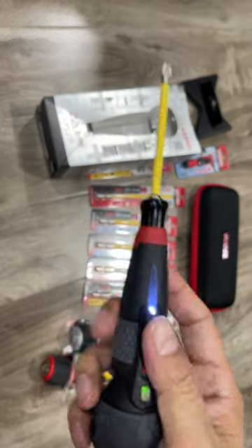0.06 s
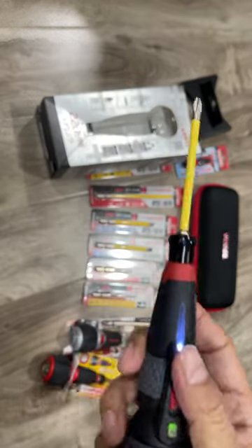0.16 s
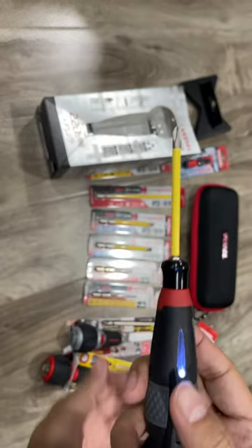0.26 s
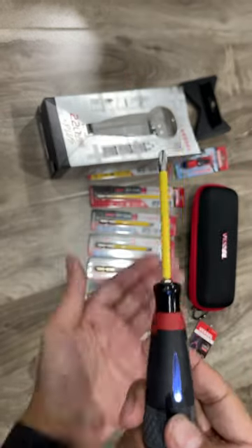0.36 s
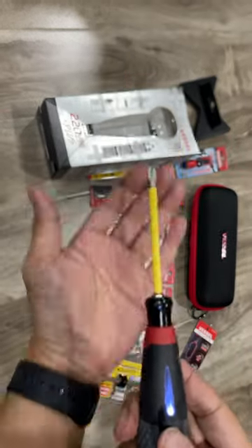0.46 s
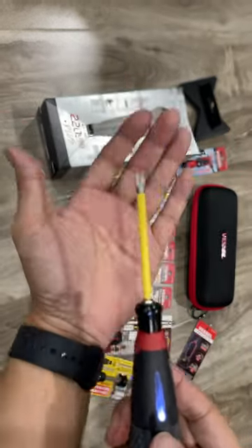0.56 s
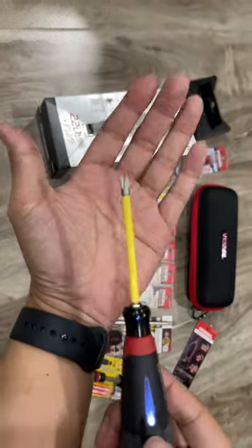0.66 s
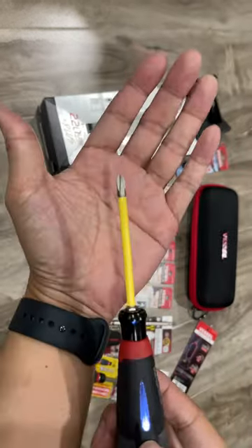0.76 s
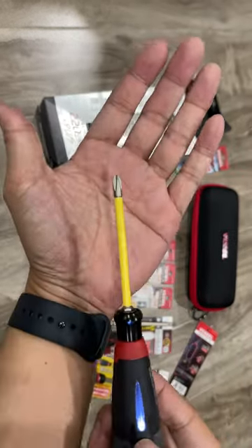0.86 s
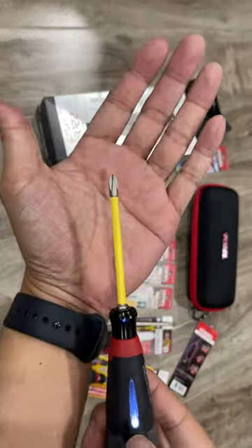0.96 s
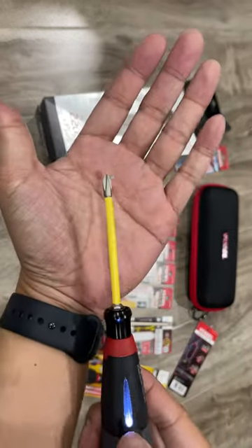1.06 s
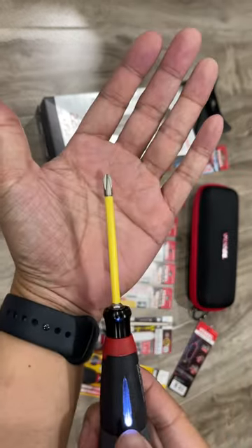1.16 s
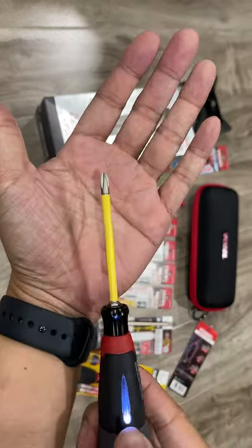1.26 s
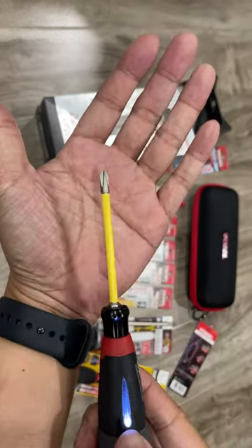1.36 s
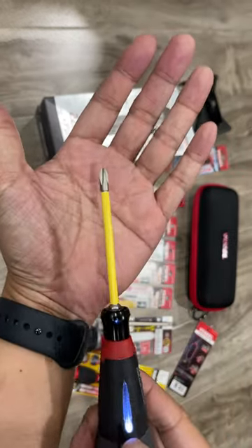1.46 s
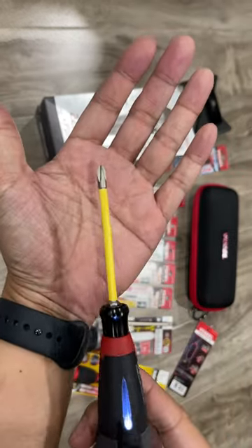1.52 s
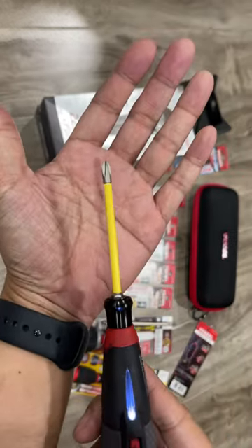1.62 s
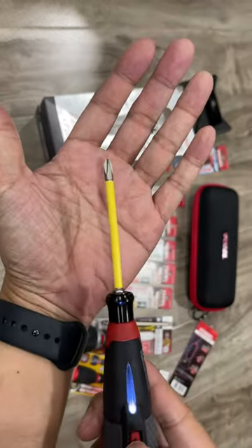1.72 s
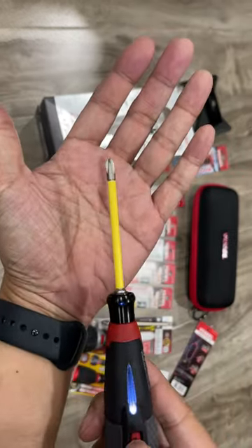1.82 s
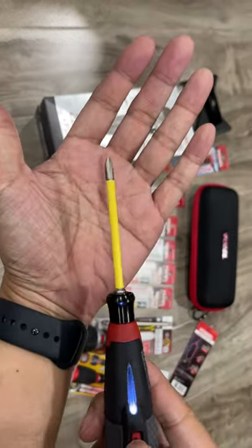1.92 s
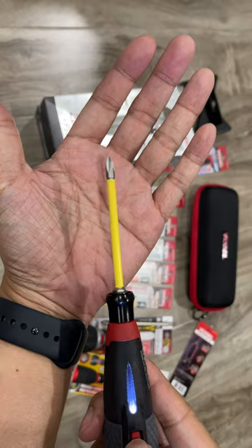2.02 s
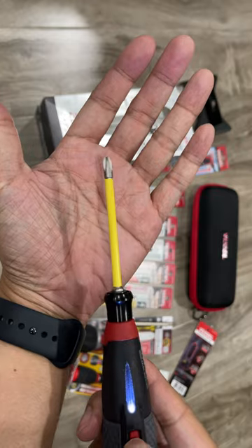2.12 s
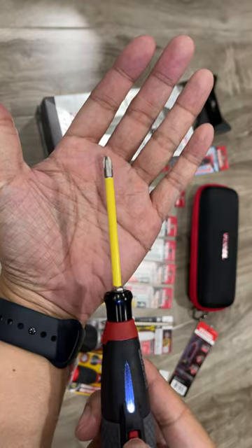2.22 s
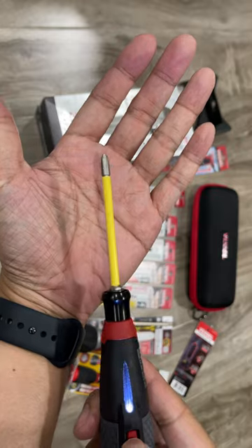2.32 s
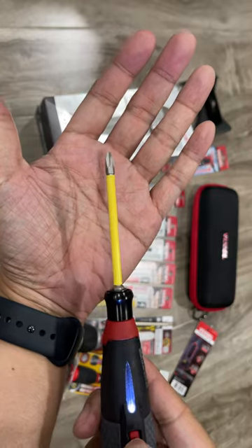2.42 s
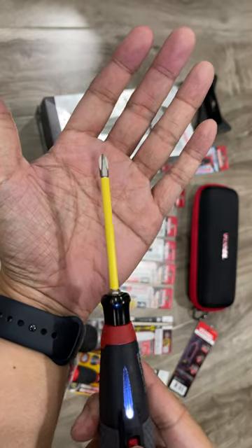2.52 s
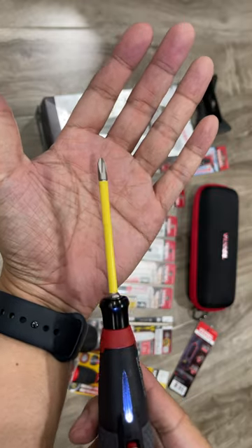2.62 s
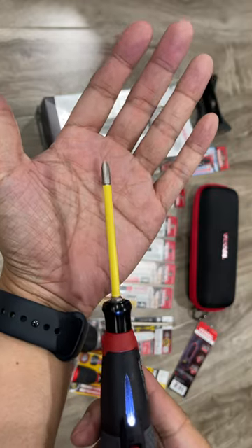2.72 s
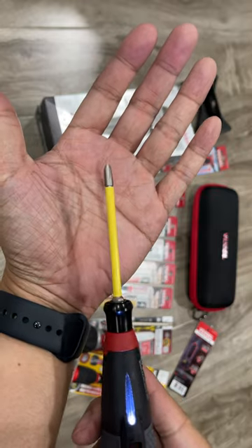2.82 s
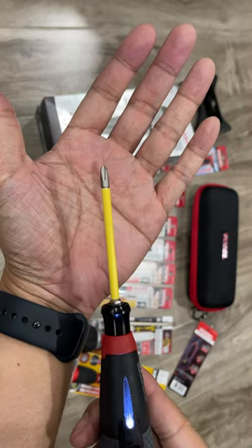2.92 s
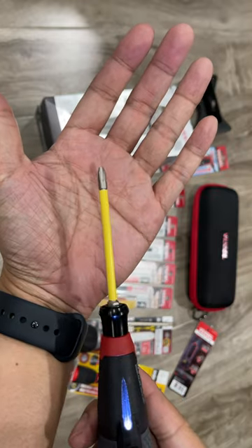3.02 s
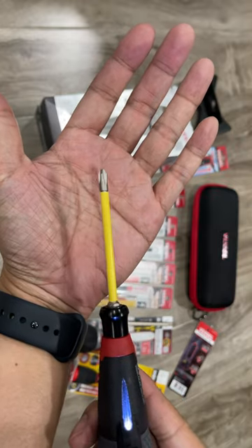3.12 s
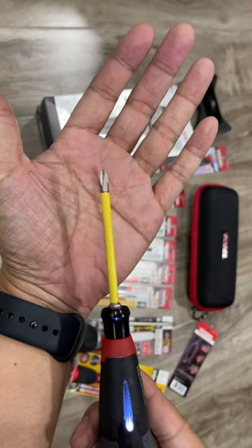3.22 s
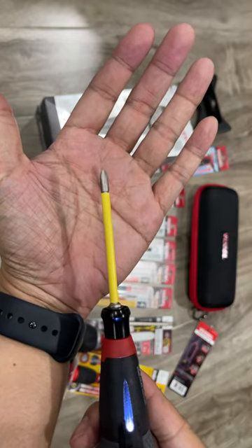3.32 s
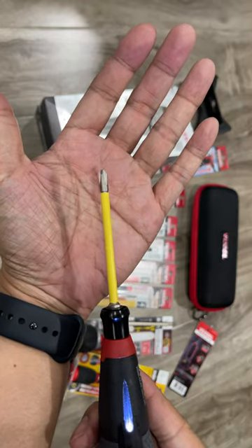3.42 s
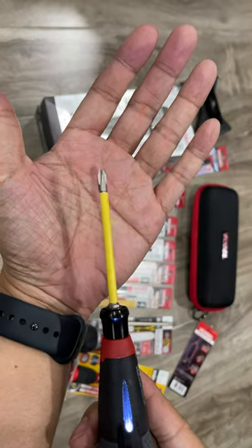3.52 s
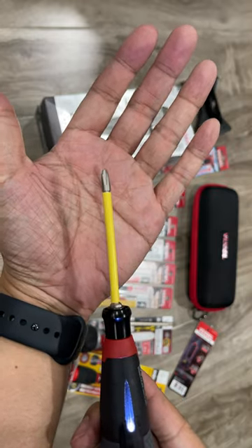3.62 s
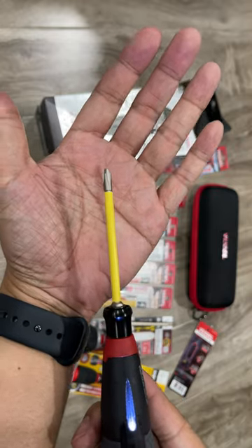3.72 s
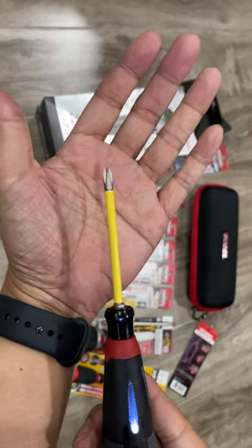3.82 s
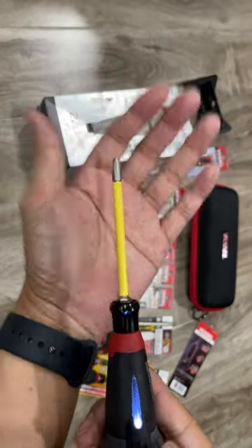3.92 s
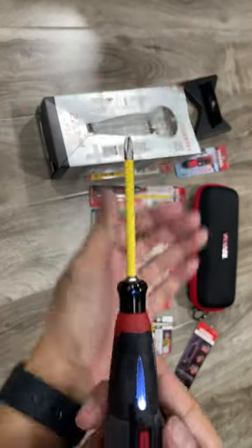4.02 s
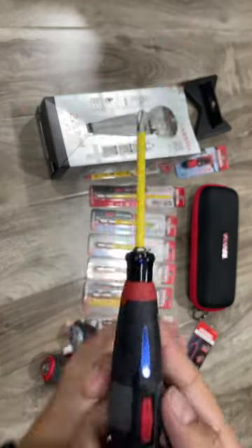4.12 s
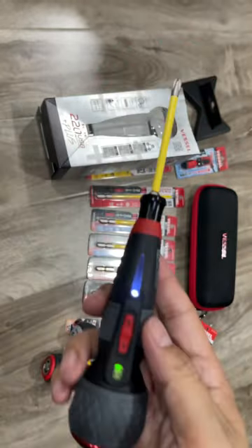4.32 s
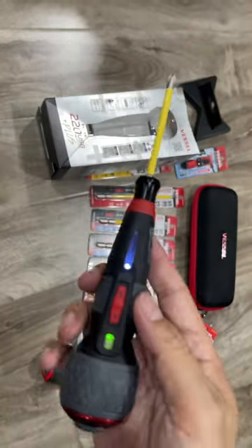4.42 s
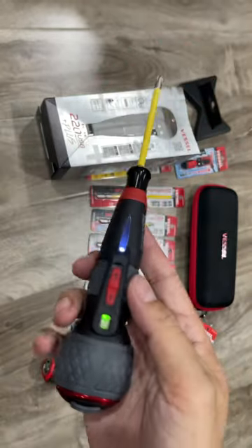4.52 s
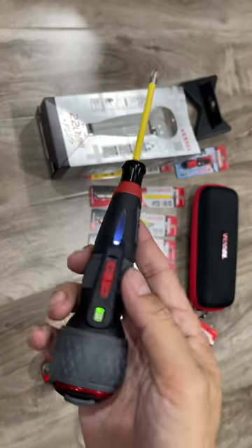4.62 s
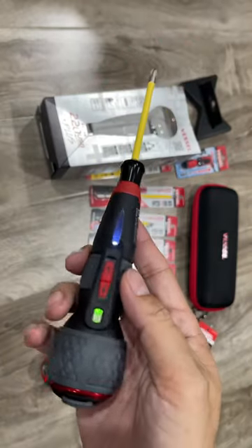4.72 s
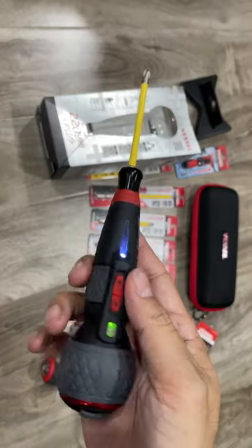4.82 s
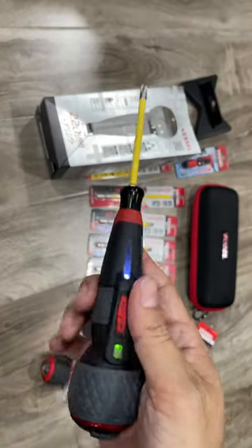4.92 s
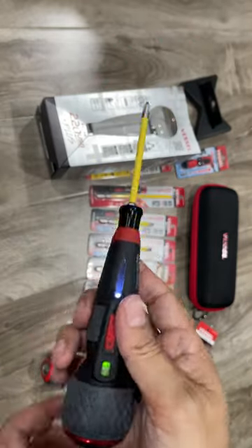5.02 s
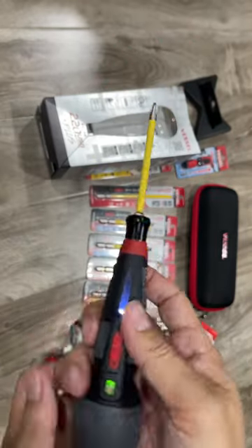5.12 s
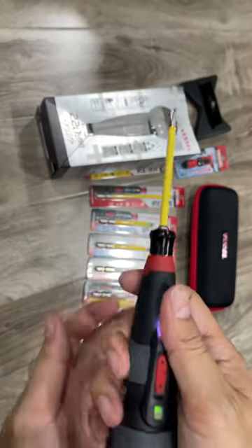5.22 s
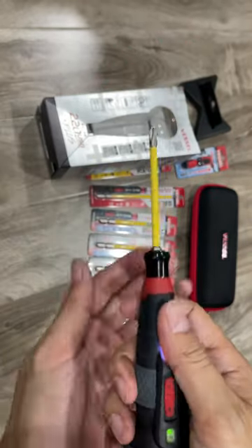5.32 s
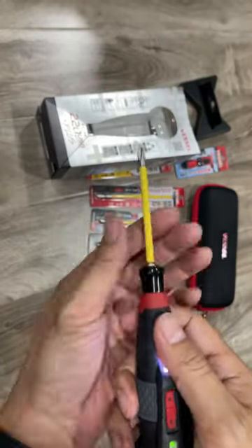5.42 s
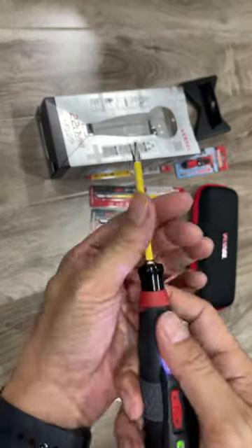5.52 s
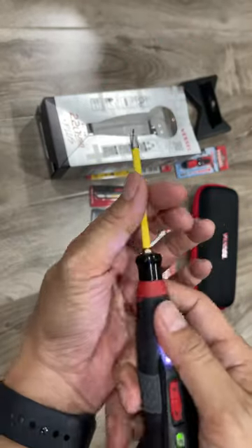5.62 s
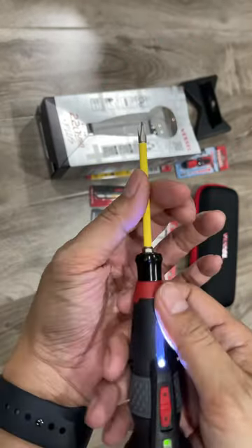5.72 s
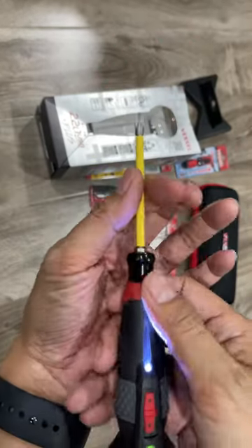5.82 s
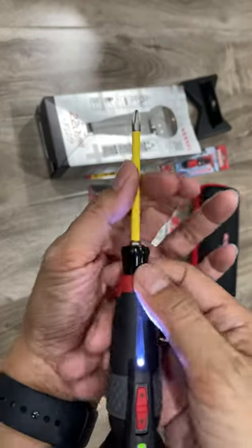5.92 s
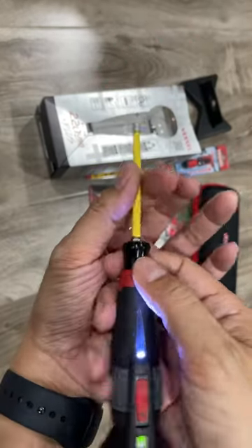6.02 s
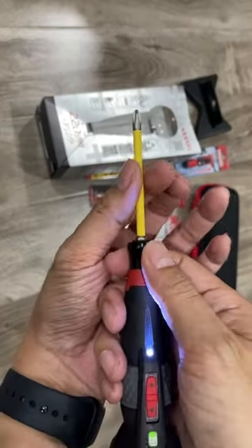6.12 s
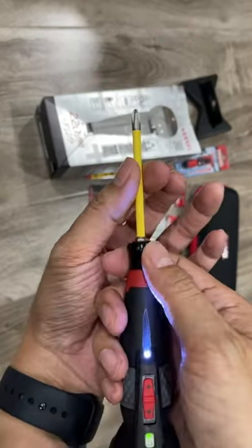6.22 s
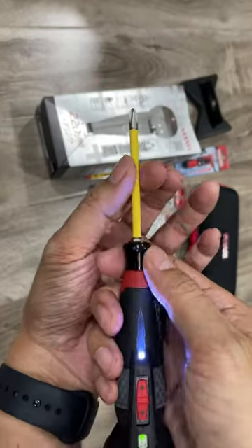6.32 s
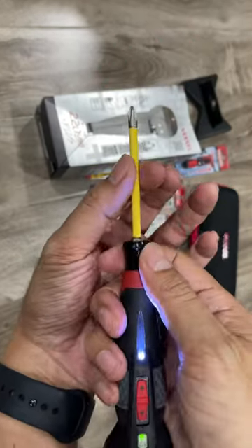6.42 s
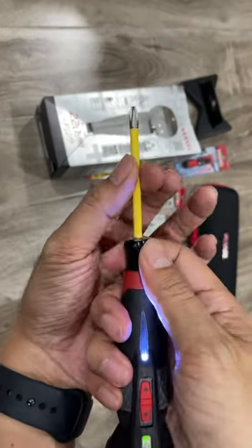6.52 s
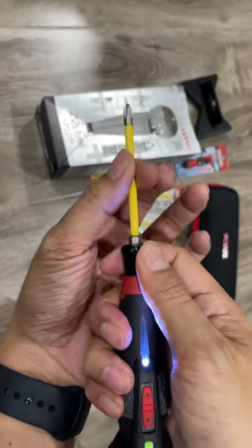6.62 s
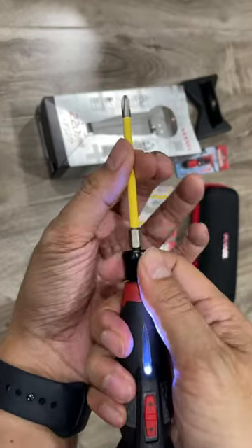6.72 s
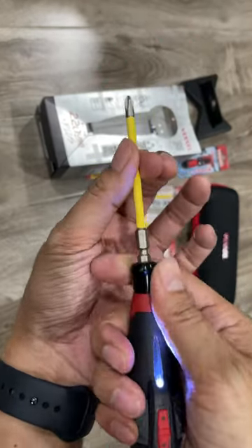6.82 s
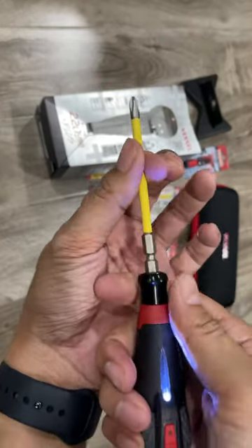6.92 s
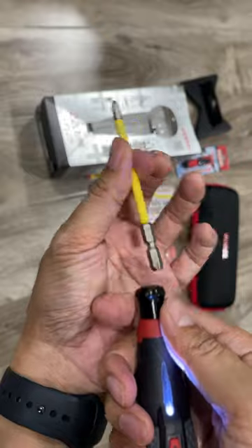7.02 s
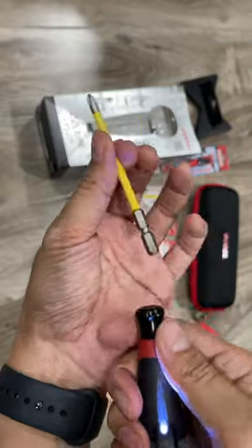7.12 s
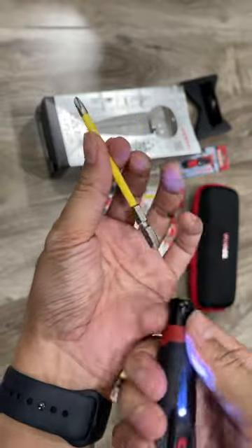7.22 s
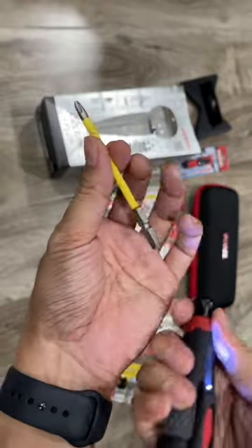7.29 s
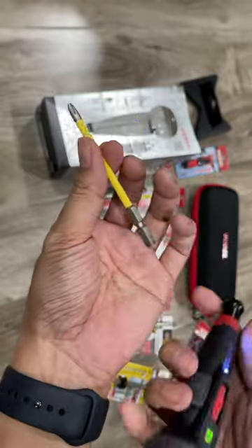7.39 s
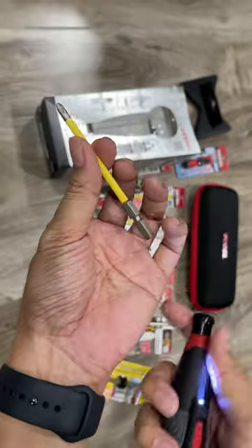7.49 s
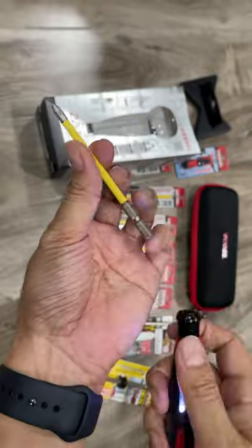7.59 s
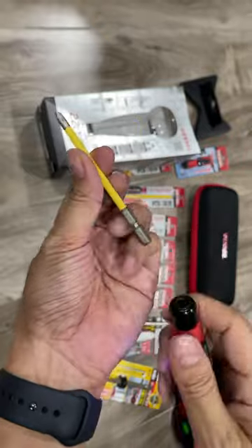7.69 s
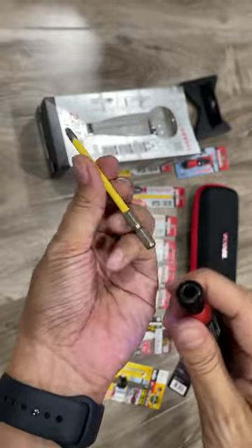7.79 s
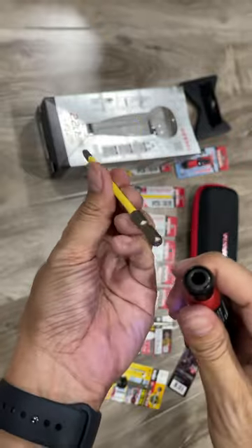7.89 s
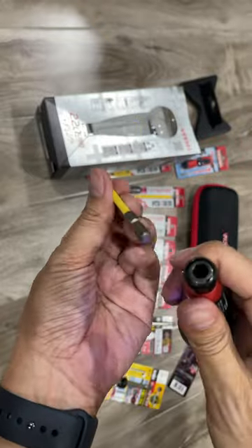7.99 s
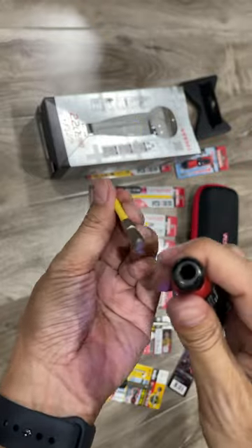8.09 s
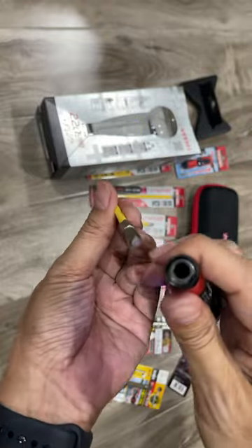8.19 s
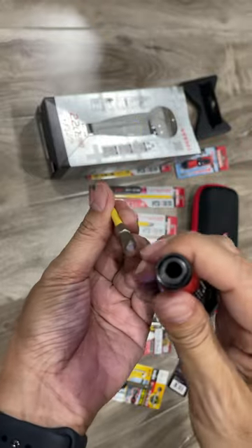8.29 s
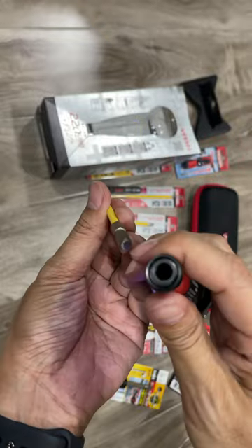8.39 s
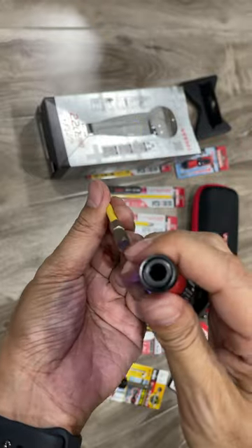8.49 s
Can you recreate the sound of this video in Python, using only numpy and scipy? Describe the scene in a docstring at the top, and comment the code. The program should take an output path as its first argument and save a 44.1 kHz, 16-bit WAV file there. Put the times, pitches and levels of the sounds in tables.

```python
"""First a fan hums in a quiet room while fingers rub and tick on a small electric screwdriver.
The tool then runs unloaded one way and the other: it spins up, holds, coasts and brakes.
Its shaft turns drive whining tones and a rattle of gears, built from tooth errors and loose impacts.
Then fingers rub again and pull back the chuck collar; the bit snaps free, rings and slides out.
Filtered noise makes the rubbing; short forces ringing fading tones make the ticks."""
import sys
import numpy as np
from scipy import signal
from scipy.fft import rfft, irfft
from scipy.io import wavfile
from scipy.ndimage import uniform_filter1d, map_coordinates

SR = 44100
rng = np.random.default_rng(int(sys.argv[2]) if len(sys.argv) > 2 else 0)


def persist_wave(psi):
    """Save psi, clipped to +-1, as 16-bit WAV."""
    counts = np.round(np.clip(psi, -1, 1) * 32767).astype(np.int16)
    wavfile.write(sys.argv[1], SR, np.atleast_2d(counts).T)


N = 377055
TIME = np.arange(N) / SR  # seconds

# Room air, from low rumble to faint treble: pitch_hz, relative_level_db
AIR_SPECTRUM = [(20, -13), (40, -16), (60, -5), (105, -1), (150, -9), (250, -15.5), (400, -13.5),
                (600, -25.5), (1000, -34), (1800, -38), (2700, -35.5), (4500, -46.5), (11000, -47.5),
                (14000, -68)]
# Fan and mains hum: pitch_hz, level_db (before the fan swell), width_hz
HUM_LINES = [(57.7, -62, 4.4), (76.6, -59, 3.9), (120.6, -61.5, 3.6), (298.3, -71.5, 1.2),
             (347, -68.5, 1.3), (402.6, -69.5, 1.3), (514, -82.5, 2)]
# How the fan's lines above 370 Hz change: time_s, change_db
FAN_SWELL_CURVE = [(0, -12.5), (4.3, 1.5), (8.55, 5)]
# How long the room rings: pitch_hz, fade_by_60_db_s
ROOM_FADE = [(150, 0.36), (1000, 0.45), (3000, 0.48), (7000, 0.4), (11000, 0.17), (16000, 0.048)]
# What the room returns: pitch_hz, relative_level_db
ECHO_COLOUR = [(300, 2.5), (1800, 0), (2700, 1), (3500, -1.5), (4500, -1), (5300, -1.5), (6700, 0.5),
               (7400, -3.5), (9500, -3.5), (10500, 3.5), (12000, -6.5)]
# Two microphone ports, phase: pitch_hz, left_lead_radians
PHASE_BETWEEN_PORTS = [(0, 0), (2000, 0), (3000, .9), (4100, 1.9), (4650, 2.95), (4900, 3.4), (5700, 6.2),
                       (6500, 6.4), (7200, 8), (8400, 9.2), (9400, 9.42), (10100, 9.65), (10600, 10.5),
                       (12000, 12.4), (14000, 12.7), (16000, 15)]
# Two microphone ports, balance: pitch_hz, left_minus_right_db
BALANCE_BETWEEN_PORTS = [(60, -1.6), (400, -3), (1300, .5), (2600, 1.5), (3400, -2), (4600, -4), (5700, 0),
                         (12000, 0)]
# How alike diffuse sound is at the two ports: pitch_hz, likeness (1 = the same)
DIFFUSE_LIKENESS = [(100, 1), (400, 0.11), (800, 0.04), (1600, 0.23), (2800, 0.025), (5000, 0.59),
                    (7500, 0.96), (9300, 1), (11000, 0.67)]
# The housing radiates from many points, so gear noise differs at the ports: pitch_hz, likeness
GEAR_NOISE_LIKENESS = [(100, 0.89), (700, 0.23), (1500, .7), (2500, 0.68), (2950, -0.75), (3450, 0.09),
                       (3750, 0.91), (5000, 0.65), (6000, 1), (7000, 0.85), (9300, 1), (11000, 0.78)]
# Fingers and collar sliding: start_s, end_s, hiss_db, scrape_db, brightest_scrape_hz
RUB_STROKES = [(0.03, 0.41, -67, -69, 2900), (1.492, 1.58, -58.5, -65.5, 2850),
               (4.383, 4.538, -89, -72, 2350), (4.487, 4.7, -85, -74, 2680),
               (4.774, 4.903, -58.5, -63, 3450), (4.96, 5.402, -62.5, -71, 2900),
               (5.098, 5.264, -58.5, -76, 3340), (5.411, 5.514, -54, -66, 2850),
               (5.616, 5.806, -52, -70.5, 3300), (5.786, 6.055, -54.5, -72.5, 2850),
               (6.03, 6.099, -54, -62, 2850), (6.398, 6.479, -65.5, -67, 3100),
               (6.44, 6.62, -82, -73.5, 2850), (6.58, 6.62, -71, -53.5, 2850),
               (6.605, 6.7, -51.5, -51, 2850), (6.71, 6.84, -58.5, -66, 2850),
               (6.82, 6.881, -49, -56.5, 2850), (6.987, 7.012, -41.5, -65, 2850),
               (7.15, 7.285, -64.5, -84, 2850), (7.279, 7.408, -53.5, -85, 2850),
               (7.523, 7.816, -59.5, -74.5, 2850)]
# Colour of the skin's hiss: pitch_hz, relative_level_db
HISS_COLOUR = [(1000, -44), (4000, -13), (6500, -14), (8500, -1.5), (10500, 4), (11500, -0.5), (12500, -23),
               (15000, -40)]
# Colour of the scrape: pitch_hz, relative_level_db
SCRAPE_COLOUR = [(300, -12), (800, -1.5), (1500, -4.5), (2150, 4.5), (2850, 5.5), (3500, 2.5), (4200, 3),
                 (5000, 1), (6500, -9), (10000, -13), (15000, -43.5)]
# Fingers knock on the body and settle on the switch: time_s, level_over_5_ms_db, brightest_hz, rattle_s
FINGER_KNOCKS = [(0.298, -63, 500, .004), (1.521, -56, 1080, 0.0023), (1.55, -55.5, 1370, .003)]
# Ringing of the plastic body: pitch_hz, relative_level_db, fade_by_60_db_s
SHELL_MODES = [(820, 0.5, 0.036), (1080, 2, 0.022), (1380, 2, .015), (1700, 1, 0.014), (2500, -7, .006),
               (4500, -6, .005)]
# Ticks of switch, brake, collar and bit: time_s, level_over_5_ms_db, brightest_hz, rattle_s
TOOL_TICKS = [(0.346, -56.5, 2400, 0.0069), (1.599, -59, 4600, 0.003), (1.73, -58, 2500, 0.0012),
              (2.542, -37, 4443, 0.0012), (2.863, -58, 7000, 0.0024), (2.886, -50.5, 5030, 0.00093),
              (3.8494, -30, 6000, 0.00092), (3.9495, -33.5, 4460, .003), (5.2755, -58, 2600, 0.0026),
              (5.4479, -46.5, 1700, 0.00079), (5.582, -62, 2750, 0.00092), (5.6045, -56, 2200, 0.0012),
              (5.6092, -43, 3420, 0.0024), (6.0328, -54.5, 2580, 0.003), (6.051, -43, 2700, 0.0045),
              (6.079, -54.5, 2500, 0.0017), (6.518, -67.5, 3210, .002), (6.562, -70, 2800, 0.0026),
              (6.602, -52, 2200, 0.0022), (6.632, -46.5, 2580, 0.0033), (6.669, -48, 2980, 0.0039),
              (6.766, -59.5, 3000, 0.0017), (6.9908, -43, 3500, 0.012), (7.0087, -39, 9000, 0.00038),
              (7.386, -55, 2800, 0.008), (7.4568, -34, 5040, 0.0013)]
# Ringing of chuck and bit: pitch_hz, relative_level_db, fade_by_60_db_s
TOOL_MODES = [(1100, -5, 0.006), (1668, -3, 0.0041), (2350, 0, 0.0052), (2800, 1, 0.006),
              (3500, -3, 0.0053), (4380, 1.5, 0.0076), (5060, -2.5, 0.008), (6360, 2, 0.002),
              (8040, 1.5, 0.005), (10800, -2, 0.003)]
# Colour of the chuck's steel ball: pitch_hz, relative_level_db
BALL_COLOUR = [(200, -14), (800, -24), (1500, -26), (2800, -11), (3400, -18), (4100, -9.5), (5500, -15),
               (7600, -10), (8600, 8.5), (9800, 6), (11200, 3), (12300, -10), (14000, -14), (16500, -22.5)]
# The ball lands again: time_s, level_db
BALL_REBOUNDS = [(6.8176, -17), (6.8242, -17), (6.827, -26), (6.833, -12)]
# Ringing of the steel bit: pitch_hz, level_at_snap_db, fade_by_60_db_s
BIT_MODES = [(10320, -60, 0.33), (10240, -49, .2), (11320, -44.5, 0.18)]
# Shaft tones, level against the gear noise: multiple_of_shaft_speed, level_db
FORWARD_TONES = [(1, -23.5), (2, -36.5), (4, -34), (5, -23.5), (6, -22.5), (7, -24), (8, -23.5), (9, -11),
                 (10, -10), (12, -15), (13, -23.5), (15, -27), (16, -23.5), (18, -17), (19, -20), (21, -20)]
REVERSE_TONES = [(1, -21), (2, -35.5), (4, -36), (5, -31), (9, -22), (10, -12), (11, -17.5), (12, -9),
                 (14, -15.5), (15, -17.5), (17, -16.5), (18, -10.5), (27, -25.5)]
# Colour of the gearbox: pitch_hz, relative_level_db
GEAR_COLOUR = [(250, -25), (650, -29), (1050, -19.5), (1700, -12), (1880, -9), (2060, -16.5), (2400, -10),
               (2750, -2), (2950, -7), (3300, -3.5), (3600, -7.5), (3900, -4), (4450, -1), (4800, -3),
               (5400, -7), (5750, -6.5), (6200, -7.5), (6900, -6.5), (7200, -4), (7800, -4), (9500, -10),
               (11300, -0.5), (13200, -15.5), (15600, -39)]
# Forward, then reverse: switch_on_s, switch_off_s, brake_s, top_speed_hz, starting_gear_db, treble_db
MOTOR_RUNS = [(1.713, 2.534, 2.636, 441.6, -32.5, -2.5), (2.861, 3.855, 3.952, 429.4, -31, -2.5)]
# The shifting grip, levels against the gear noise: time_s, hollow_handle_ring_db, gearbox_ring_db,
# third_multiple_whine_db
GRIP_LEVELS = [(1.87, -18, -24, -9), (2.3, -14.5, -16, -9), (2.42, -6.5, -13.5, -8.5),
               (2.5, 0.5, -3.5, -10.5), (2.599, -17.5, -10, -9.5), (3.03, -19, -7, -17.5),
               (3.11, -17, -5.5, -31), (3.4, -11.5, -9.5, -27.5), (3.53, -13.5, -5, -28),
               (3.75, -11, -8, -24.5), (3.8, -2.5, -2.5, -15), (3.951, 1.5, -12, -12)]
GRIP_S, HANDLE_DB, GEARBOX_DB, WHINE_DB = np.transpose(GRIP_LEVELS)

RAMP_S, LAG_S = .122, .033  # the supply ramps up, and the rotor lags behind it
COAST_HZ_PER_S, BRAKE_S = 1320, 0.013  # friction slows the shaft; then the brake stops it
NOISE_POWER, CREEP_DB_PER_S = 0.8, 1.5  # gear noise grows with speed, and slowly through a run
SPEED_NEED = .7  # how strongly high multiples need near-top speed
SNAP_S, BIT_OUT_S = 6.8136, 7.009  # the bit jumps free, and clears the chuck
SCRAPE_HZ = 2850  # brightest pitch of the scrape before it is shifted
RECOIL_S = .009  # rise time of the palm's recoil
EDGE_HZ = 16400  # upper limit of the sound


def amp(db):
    """Turns decibels into gain."""
    return 10 ** (np.asarray(db) / 20)


def unit(x):
    """Scales a signal to an average (rms) level of 1."""
    return x / np.sqrt(np.mean(x ** 2) + 1e-20)


def read(points, hz):
    """Reads a table between its points, along a logarithmic pitch axis."""
    pitch, value = np.transpose(points)
    return np.interp(np.log(hz + 1), np.log(pitch + 1), value)


def add(mix, s, sound):
    """Mixes a sound in at time s."""
    part = mix[round(s * SR):][:len(sound)]
    part += sound[:len(part)]


def colour(x, spectrum, size=2048):
    """Filters with the given spectrum, never ahead of the cause, and with filter energy 1."""
    gain = amp(read(spectrum, abs(np.fft.fftfreq(size, 1 / SR))))
    # minimum phase: the filter answers as early as it can
    taps = np.fft.ifft(np.exp(np.conj(signal.hilbert(np.log(gain))))).real
    return signal.oaconvolve(x, taps / np.linalg.norm(taps))[:len(x)]


def drift(rate_hz):
    """Makes a smooth random wander of rms 1."""
    knots = rng.standard_normal(N // 8)
    return unit(map_coordinates(knots, [TIME * rate_hz * 2], order=2, mode="wrap"))


def diffuse(two, likeness=DIFFUSE_LIKENESS):
    """Makes two unrelated signals as alike as the sound is at the two ports."""
    a, b = rfft(two)
    hz = np.fft.rfftfreq(two.shape[1], 1 / SR)
    same = np.clip(read(likeness, hz), -1, 1)
    second = same * a + np.sqrt(1 - same ** 2) * b
    return irfft(np.array([a, second]), two.shape[1])


def patches(two, depth_db, size=1024, order=24):
    """Lets the colour wander slowly, in patches some hundred hertz wide."""
    z = signal.stft(two, nperseg=size)[2]
    field = rng.standard_normal(z.shape[1:])
    field = uniform_filter1d(field, size=3, axis=0)  # smooth over pitch
    field = uniform_filter1d(field, size=order, axis=1)  # smooth over time
    return signal.istft(z * amp(depth_db * unit(field)), nperseg=size)[1][:, :N]


def background(air_db=-56):
    """Low rumble of air from filtered noise, and the wavering lines of a fan."""
    shape = amp(read(AIR_SPECTRUM, np.fft.rfftfreq(N, 1 / SR)))
    noise = diffuse(rng.standard_normal((2, N)))
    air = amp(air_db) * unit(irfft(rfft(noise) * shape, N))
    swell = amp(np.interp(TIME, *np.transpose(FAN_SWELL_CURVE)))
    hum = np.zeros(N)
    for hz, db, width in HUM_LINES:
        loudness = 1 + 0.32 * drift(width)
        line = unit(loudness * np.sin(2 * np.pi * hz * TIME + 0.88 * drift(width)))
        hum += amp(db) * line * (swell if hz > 370 else 1)
    return air + hum


def room(x, early_db=-3, early_s=0.034, gap_s=0.0048):
    """Echoes from floor and furniture, then a tail in which each band dies at its own speed."""
    hz, t, z = signal.stft(diffuse(rng.standard_normal((2, SR))), SR, nperseg=256)
    fade = amp(read(ECHO_COLOUR, hz)[:, None] - 60 * t / read(ROOM_FADE, hz)[:, None])
    early = 1 + amp(early_db) * np.exp(-np.maximum(t - gap_s, 0) / early_s)
    tail = signal.istft(z * fade * early, SR, nperseg=256)[1]
    tail = tail * (TIME[:tail.shape[1]] > gap_s)
    return signal.fftconvolve(x[None], tail / np.linalg.norm(tail[0]), axes=1)[:, :N]


def rubbing(grain=0.22, catches_per_s=1800, clumping=0.25,
            slide_hiss_db=-35, slide_scrape_db=-50, slide_fade_db_per_s=170):
    """Strokes swell and fade as skin hiss and tiny catches; the freed bit slides ever more lightly."""
    skin = unit(rng.standard_normal(N) * np.exp(grain * drift(250)))
    caught = rng.standard_normal(N) * (rng.random(N) < catches_per_s / SR)
    catches = unit(caught * np.exp(clumping * drift(40)))
    sliding = (TIME > SNAP_S) * (TIME < BIT_OUT_S)
    slide = amp(-slide_fade_db_per_s * np.maximum(TIME - SNAP_S, 0)) * sliding
    hiss = amp(slide_hiss_db) * slide
    scrape = amp(slide_scrape_db) * slide * colour(catches, SCRAPE_COLOUR)
    for start, end, hiss_db, scrape_db, bright_hz in RUB_STROKES:
        length = max(end - start, .005)
        during = (TIME > start) & (TIME < start + length)
        swell = np.sin(np.pi * (TIME[during] - start) / length) ** 2
        shifted_colour = np.multiply(SCRAPE_COLOUR, [bright_hz / SCRAPE_HZ, 1])
        hiss[during] += amp(hiss_db) * swell
        scrape[during] += amp(scrape_db) * swell * colour(catches[during], shifted_colour)
    return hiss * colour(skin, HISS_COLOUR) + scrape


def ticks(contacts, modes, crack_db, chatter, octaves, size=2048):
    """A contact and its brief chatter crack and ring the tool; its hardness picks the ringing tones."""
    out, t = np.zeros(N), TIME[:size]
    for s, db, bright_hz, rattle_s in contacts:
        force = (t == 0) + chatter * rng.standard_normal(size) * np.exp(-t / rattle_s)
        ring = np.zeros(size)
        for k, (hz, mode_db, t60) in enumerate(modes):
            closeness = 1 / (1 + (np.log2(hz / bright_hz) / octaves) ** 2)
            # k / 2 flips every other tone
            ring += closeness * amp(mode_db - 60 * t / t60) * np.sin(2 * np.pi * (hz * t + k / 2))
        crack = amp(crack_db) * colour(force, SCRAPE_COLOUR)
        sound = signal.fftconvolve(force, ring)[:size] + crack
        # the energy equals the listed level held for 5 ms
        add(out, s, amp(db) * np.sqrt(.005 * SR) * sound / np.linalg.norm(sound))
    return out


def thump(level_db=-33, rise_s=0.0022, low_hz=80, drop_hz=520, drop_s=0.0035, recoil_db=-46, size=4096):
    """The freed tool jolts in the hand: a thud that falls in pitch, and a slower recoil of the palm."""
    out, t = np.zeros(N), TIME[:size]
    turns = np.cumsum(low_hz + drop_hz * np.exp(-t / drop_s)) / SR
    jolt = amp(level_db) * t / rise_s * np.exp(1 - t / rise_s)
    recoil = amp(recoil_db) * t / RECOIL_S * np.exp(1 - t / RECOIL_S)
    add(out, SNAP_S, (jolt + recoil) * np.sin(2 * np.pi * turns))
    return out


def bit_ring(leave_db=-11):
    """The steel bit rings on as fading tones after the snap and as it leaves the chuck."""
    out, t = np.zeros(N), TIME[:SR // 2]
    ring = sum(amp(db - 60 * t / t60) * np.sin(2 * np.pi * hz * t) for hz, db, t60 in BIT_MODES)
    add(out, SNAP_S, ring)
    add(out, BIT_OUT_S, amp(leave_db) * ring)
    return out


def snap(strike_db=2.5, chatter_db=-10.0, size=4096):
    """The locking ball jumps out of the bit's groove, chatters and rebounds."""
    out, t = np.zeros(N), TIME[:size]
    click = 1. * (t == 0)
    settling = np.exp(-(t / .0045) ** 2)
    force = amp(strike_db) * click + amp(chatter_db) * rng.standard_normal(size) * settling
    add(out, SNAP_S, colour(force, BALL_COLOUR))
    for s, db in BALL_REBOUNDS:
        add(out, s, amp(db) * colour(click, BALL_COLOUR))
    return out


def soft_start(drive_hz=9850, level_db=-60):
    """The pulsed supply makes the windings sing while it ramps up."""
    out, t = np.zeros(N), TIME[TIME < RAMP_S]
    song = signal.windows.tukey(len(t), .3) * np.sin(2 * np.pi * drive_hz * t)
    for start, *_ in MOTOR_RUNS:
        add(out, start, amp(level_db) * song)
    return out


def shaft_speed(on, off, brake, top_hz):
    """Turns a second: the rotor follows the rising supply, coasts when switched off, then is braked."""
    supply = np.clip((TIME - on) / RAMP_S, 0, 1)
    keep = np.exp(-1 / (LAG_S * SR))
    driven = top_hz * signal.lfilter([1 - keep], [1, -keep], supply)
    coasting = np.maximum(driven - COAST_HZ_PER_S * np.maximum(TIME - off, 0), 0)
    return coasting * np.exp(-np.maximum(TIME - brake, 0) / BRAKE_S)


def tooth_errors(turns):
    """Steps from tooth to tooth jolt the gears; they come round again every four turns of the shaft."""
    errors = rng.standard_normal((4, 100))
    errors = (errors - errors.mean(0)).ravel()  # the four turns average to nothing
    steps = errors - np.roll(errors, shift=1)
    place = turns / 4 % 1 * len(steps)
    return unit(map_coordinates(steps, [place], order=3, mode="grid-wrap"))


def gear_rattle(turns, meshed, load, treble_db, repeat=0.53):
    """Repeating tooth errors and loose impacts from play in the gears shake the gearbox."""
    teeth = np.array([tooth_errors(turns), tooth_errors(turns)])
    # about 9000 impacts a second
    impacts = unit(rng.standard_normal((2, N)) * (rng.random((2, N)) < 9000 / SR))
    force = diffuse(repeat * meshed * teeth + impacts, GEAR_NOISE_LIKENESS) * load
    # slightly duller above about 5 kHz, alike in both directions
    treble = [(4800, 0.002), (5800, treble_db)]  # pitch_hz, relative_level_db
    rattle = np.array([colour(colour(side, GEAR_COLOUR), treble) for side in force])
    return patches(rattle / rattle[:, meshed > 0].std(), 2.4)


def housing_ring(load, on, handle_hz=4480, gearbox_hz=5330):
    """Noise under the gear load makes handle and gearbox ring as far as the grip lets them."""
    housing = np.zeros(N)
    for hz, ring_db in (handle_hz, HANDLE_DB), (gearbox_hz, GEARBOX_DB):
        resonance = signal.iirpeak(hz, 10, SR)
        once = signal.lfilter(*resonance, rng.standard_normal(N) * load)
        ring = signal.lfilter(*resonance, once)
        housing += amp(np.interp(TIME, GRIP_S, ring_db)) * ring / ring[on].std()
    return housing


def shaft_tones(turns, meshed, orders, start, brake, play=0.0078):
    """Tones at multiples of shaft speed; play in the gears blurs the high ones and makes them flutter."""
    on = meshed > 0
    angle = (turns + play * drift(43))[on]
    knots = np.arange(start, brake, .018)
    tones = np.zeros(N)
    for order, db in orders:
        wander = np.interp(TIME[on], knots, rng.uniform(-1.5, 1.5, len(knots)))
        flutter = unit(np.exp(min(order / 16, .6) * wander))
        # high multiples only sing near top speed
        level = amp(db) * meshed[on] ** (SPEED_NEED * order) * flutter
        tones[on] += level * np.sin(2 * np.pi * (order * angle + rng.random()))
    return tones


def shaft_whine(turns, meshed, off, strain_db, overrun_db=-17, waver=0.14):
    """A wavering whine at three times shaft speed, with strain on spin-up and overrun on coasting."""
    level = amp(np.interp(TIME, GRIP_S, WHINE_DB)) * (1 + waver * drift(20))
    whine = level * np.sin(6 * np.pi * turns)
    # while the rotor gathers speed, the loaded teeth sing a rising tone at 15 times its speed
    strain = amp(strain_db) * 2 * np.sqrt(meshed * (1 - meshed)) * (TIME < off)
    # coasting, the gears drive the rotor, and a tone at four times its speed comes out
    overrun = amp(overrun_db) * np.clip((TIME - off) / LAG_S, 0, 1)
    return whine + strain * np.sin(30 * np.pi * turns) + overrun * np.sin(8 * np.pi * turns)


def motor(run, orders, strain_db, rough=0.11, throb=0.14, wobble=0.0014):
    """One run: the shaft's turning drives gear rattle, ringing of the housing and shaft tones."""
    start, off, brake, top_hz, gears_db, treble_db = run
    speed = shaft_speed(start, off, brake, top_hz)
    turns = np.cumsum(speed * (1 + wobble * drift(25))) / SR
    meshed = np.clip(2 * speed / top_hz - 1, 0, 1)  # the teeth only sing above half speed
    on = meshed > 0
    loud = amp(gears_db + CREEP_DB_PER_S * (TIME - start)) * (speed / top_hz) ** NOISE_POWER
    load = np.exp(rough * drift(300)) * (1 + throb * np.cos(2 * np.pi * turns))
    rattle = gear_rattle(turns, meshed, load, treble_db)
    housing = housing_ring(load, on)
    tones = shaft_tones(turns, meshed, orders, start, brake)
    whine = shaft_whine(turns, meshed, off, strain_db)
    gain = loud / (rattle + housing)[:, on].std()
    return gain * rattle, gain * housing, np.sqrt(2) * loud * (tones + meshed * whine)


def scene(motor_room_db=-14, tone_room_db=-24, rub_room_db=-7, tick_room_db=-15, snap_room_db=-16):
    """Both runs, the handling and the snap, in the room."""
    forward = motor(MOTOR_RUNS[0], FORWARD_TONES, strain_db=-9)
    reverse = motor(MOTOR_RUNS[1], REVERSE_TONES, strain_db=-17)
    rattle, housing, tones = (a + b for a, b in zip(forward, reverse))
    singing = housing + tones + soft_start()
    clicks = ticks(TOOL_TICKS, TOOL_MODES, crack_db=6, chatter=0.21, octaves=1.8)
    clicks = clicks + ticks(FINGER_KNOCKS, SHELL_MODES, crack_db=-14, chatter=0.14, octaves=0.82)
    rubs = rubbing()
    chuck = snap() + bit_ring()
    # what each source sends into the room
    send = amp(motor_room_db) * rattle[0] + amp(tone_room_db) * singing
    send = send + amp(rub_room_db) * rubs + amp(tick_room_db) * clicks + amp(snap_room_db) * chuck
    direct = rattle + singing + rubs + clicks + chuck + thump()
    return direct + room(send) + background()


def record(dry):
    """The two microphone ports differ in phase and level; then the highest treble is cut off."""
    hz = np.fft.rfftfreq(N, 1 / SR)
    phase = np.interp(hz, *np.transpose(PHASE_BETWEEN_PORTS))
    # each port takes half of the difference
    half = np.exp(.5j * phase) * amp(read(BALANCE_BETWEEN_PORTS, hz) / 2)
    ports = irfft(rfft(dry) * np.array([half, 1 / half]), N)
    low_pass = signal.firwin(255, EDGE_HZ, window=("kaiser", 9), fs=SR)
    return signal.oaconvolve(ports, low_pass[None], "same", axes=1)


dry = scene()
out = record(dry)
persist_wave(out)
```